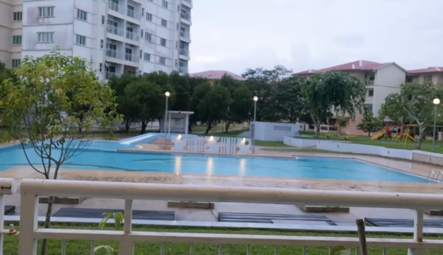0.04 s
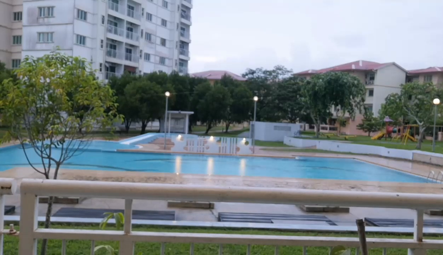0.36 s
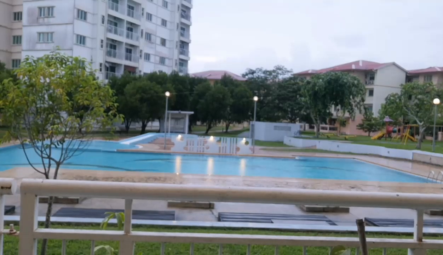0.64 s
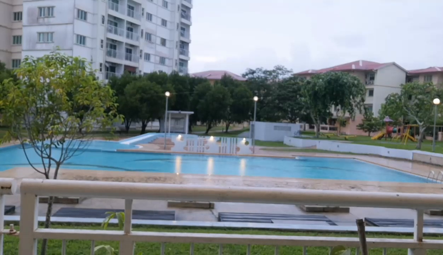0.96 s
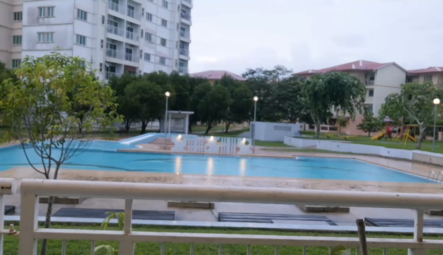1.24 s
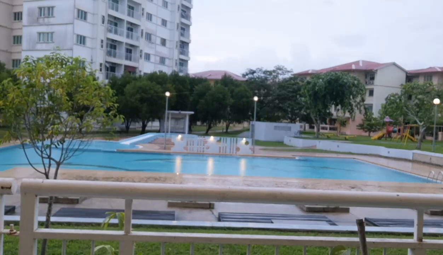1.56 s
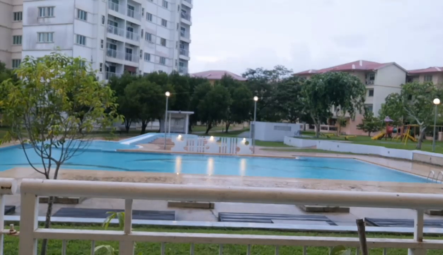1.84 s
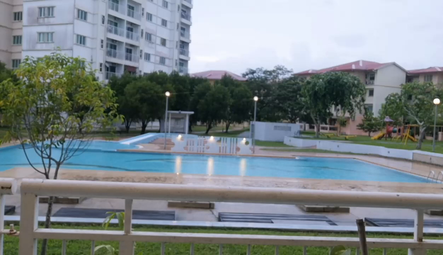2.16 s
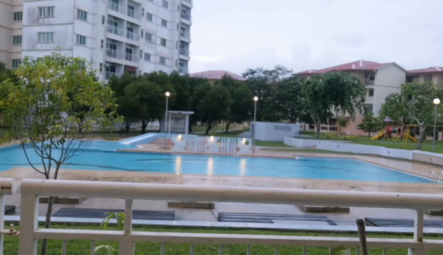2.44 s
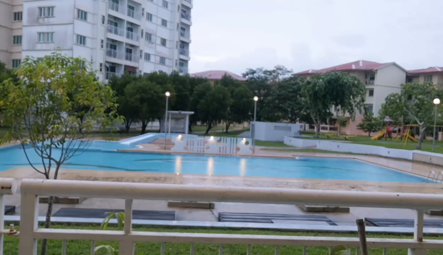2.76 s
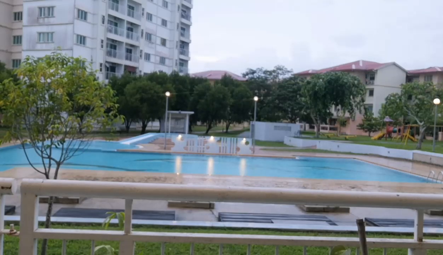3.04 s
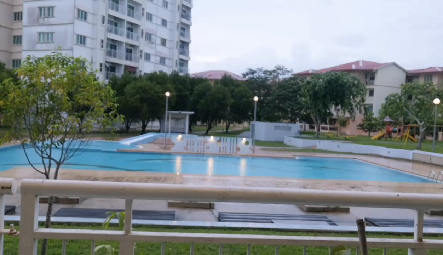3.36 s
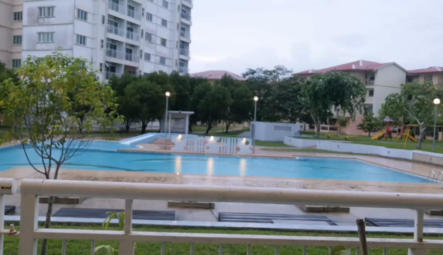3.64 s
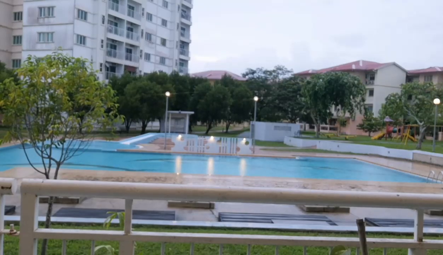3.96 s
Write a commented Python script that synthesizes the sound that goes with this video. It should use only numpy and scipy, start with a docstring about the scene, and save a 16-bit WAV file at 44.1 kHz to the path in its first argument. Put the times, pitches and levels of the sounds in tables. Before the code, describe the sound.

Light rain patters and drips outdoors, with low wind rumble on the microphone.

```python
"""Light rain by a pool among buildings, the microphones under a roof.
From the start rain washes and patters further off and wind rumbles on the microphones; a low hum wavers
through the first second. Drips plink in puddles and gutters; close by they tick on hard ground, tap on
something hollow and splatter, ringing briefly under the shelter. Dull, distant knocks begin at 0.7 s and
a small bird peeps now and then from 1.1 s. Between 1.8 and 2.7 s four puffs of air pop the microphones."""
import sys
import numpy as np
from scipy import signal
from scipy.fft import rfft, irfft
from scipy.io import wavfile
from scipy.ndimage import uniform_filter1d

SR = 44100
rng = np.random.default_rng(int(sys.argv[2]) if len(sys.argv) > 2 else 0)


def materialize(psi):
    """Save the field psi as 16-bit PCM at rate SR to the path in sys.argv[1].

    A 1-D psi becomes a single channel; in a 2-D psi each row is a channel.
    """
    bounded = np.clip(np.atleast_2d(psi).T, -1, 1)
    quanta = np.round(bounded * 32767).astype(np.int16)
    wavfile.write(sys.argv[1], SR, quanta)


N = 176400

# The place, and the microphone pair in it. Table levels are taken before each layer's gain and pan.
SHELTER_T60_S, SHELTER_GRAIN_DB, YARD_T60_S = 0.16, 10, 0.39
FAR_WALL_S, FAR_WALL_DB = 0.093, -13  # one late echo from the building opposite
ALIKE_BELOW_HZ, MIC_LAG_S = 430, 0.00018  # distant bass is alike in both; spread of arrival times

# Far rain on the pool and trees, spectrum: frequency_hz, level_db
WASH_SPECTRUM = [(150,-8.5),(250,-2),(350,-11.5),(600,-15),(950,-13),(1500,-11),(2200,-12.5),(2700,-12.5),(3500,-16.5),(4600,-20.5),(5500,-19.5),(6400,-22.5),(7900,-22.5),(10000,-24),(13000,-31),(15500,-37)]
# Its rise and fall: time_s, level_db
WASH_LEVELS = [(0,-46.5),(.35,-46.5),(.6,-47.5),(.8,-45.5),(1.0,-53.5),(1.15,-46),(1.5,-52),(1.7,-49),(2.1,-48.5),(2.25,-52.5),(2.6,-48.5),(2.8,-49.5),(2.95,-51.5),(3.4,-49),(4,-50)]
# Nearer patter of small drops, spectrum: frequency_hz, level_db
PATTER_SPECTRUM = [(800,-25),(1600,-1),(2800,-9),(3700,-6.5),(5400,1.5),(6500,-4),(7900,6.5),(10000,-8.5),(15000,-26.5)]
# Its rise and fall: time_s, level_db
PATTER_LEVELS = [(0,-48),(.65,-49.5),(.95,-58),(1.15,-55),(1.48,-56.5),(1.62,-51.5),(2.1,-52.5),(2.3,-55),(2.6,-53),(2.78,-59),(2.88,-54.5),(3.25,-54.5),(3.55,-54.5),(4,-53)]
WASH_DB, WASH_PAN_DB, FLICKER_DB = -5.5, -0.9, 1.5
PATTER_DB, PATTER_PAN_DB, PATTER_WET_DB = -10, -6, 1

# Wind rumble on the microphones, spectrum: frequency_hz, level_db
RUMBLE_SPECTRUM = [(10,-16.5),(22,0),(35,-2),(55,-3.5),(75,-9),(100,-23),(160,-27.5),(300,-60.5)]
# Its gusts: time_s, level_db
RUMBLE_LEVELS = [(0,-28),(.09,-42),(.24,-34),(.32,-45),(.41,-37.5),(.94,-38.5),(1,-47),(1.25,-45),(1.53,-51),(1.68,-42),(1.85,-38.5),(2.03,-44.5),(2.22,-56.5),(2.47,-42),(2.57,-44),(2.66,-37.5),(2.79,-54.5),(3.08,-45),(3.17,-37),(3.28,-43),(3.47,-51.5),(3.59,-40),(3.76,-50.5),(3.9,-37.5),(4,-55)]
# The wind's higher flutter, spectrum: frequency_hz, level_db
FLUTTER_SPECTRUM = [(60,-29),(95,-8),(112,0.5),(130,-5),(146,-8.5),(165,-10),(210,-17.5),(250,-34),(400,-36),(800,-63)]
# Its gusts: time_s, level_db
FLUTTER_LEVELS = [(0,-38.5),(.13,-43.5),(.21,-42.5),(.32,-42),(.5,-38.5),(.8,-42),(1,-46),(1.3,-50.5),(1.58,-58.5),(1.85,-53),(2.05,-50),(2.23,-61),(2.5,-60),(2.7,-45.5),(2.83,-67),(3.22,-51.5),(3.4,-62),(4,-56)]
# Single puffs of air on the microphones: centre_s, peak_db, half_width_s
AIR_PUFFS = [(1.79,-25.5,0.0038),(2.534,-21,0.0057),(2.632,-18,0.0076),(2.687,-15.5,0.0035)]
RUMBLE_DB, FLUTTER_DB = 4, 1

# Course of the low hum: time_s, pitch_hz, level_db
HUM_COURSE = [(.12,112.6,-40),(.18,110.7,-26),(.26,111.3,-31),(.33,113.8,-46),(.43,115.2,-46),(.49,116.8,-35.5),(.56,128.5,-30),(.68,128.2,-38.5),(.8,127,-41.5),(0.899,131,-50.5),(1,126,-78)]
HUM_WAVER = 0.026  # share of the pitch

# Farther drips in puddles and gutters: start_s, level_db, pitch_hz, fade_s
FAR_PLINKS = [(0.121,-50.5,5230,.02),(.303,-49,2060,0.017),(0.414,-52,2744,0.077),(0.714,-45.5,1540,0.03),(1.325,-52,3500,0.051),(1.685,-58,5700,0.038),(1.796,-53,1330,.04),(1.823,-53,3570,0.027),(2.408,-55,924,0.051),(2.448,-57,3590,0.11),(2.859,-52,2020,0.012)]
PLINK_WIDTH, PLINK_RISE_S, PLINK_PAN_DB = 0.12, 0.0015, -0.5  # width as a share of the pitch

# Drips on hard ground close by: start_s, level_db, pitch_hz, left_minus_right_db
NEAR_DRIPS = [(0.2324, -58, 7400, -5), (0.2731, -35.5, 4700, 2), (0.2795, -54, 5600, -3),
              (0.4134, -29.5, 7830, -10), (0.4237, -29, 8000, -9), (0.4822, -33, 8406, -1),
              (0.4891, -33.5, 7340, -11), (0.4991, -34, 8200, -15), (0.519, -35, 8900, -12),
              (0.6784, -34.5, 5750, -6), (1.0857, -40, 7500, -7), (1.62, -40, 7850, -5),
              (1.697, -42.5, 5660, -13), (1.8781, -41.5, 7830, -5.0), (1.8951, -42, 7840, 0),
              (1.915, -35, 5920, 0), (1.947, -34, 7700, -7), (2.1016, -35, 7200, -11),
              (2.2547, -39, 4960, 2), (2.3214, -43.5, 4430, -7), (2.4811, -27.5, 7700, -5),
              (2.5176, -40, 5300, -10), (2.5399, -31.5, 8700, -8), (2.8394, -35.5, 8280, -1),
              (3.203, -41, 8800, -13), (3.347, -40, 5800, -3), (3.3665, -38, 8300, -4),
              (3.3947, -34, 8200, -2), (3.4715, -41, 5440, -3), (3.7298, -33.5, 7540, 1),
              (3.7497, -35.5, 8600, -8), (3.761, -33.5, 8100, 0), (3.8591, -28.5, 7080, 2),
              (3.8684, -37, 7400, -12), (3.931, -37, 9000, -3)]
# Crack of a landing drop, spectrum: frequency_hz, level_db
CRACK_SPECTRUM = [(1000,-16),(2700,10.5),(3800,8),(5500,10),(8000,19),(11000,5.5),(15000,-17)]
# Snap of a drip's first contact, spectrum: frequency_hz, level_db
SNAP_SPECTRUM = [(2000,-28),(5000,-2),(8000,-11),(11000,-15),(15000,-14)]
DRIP_DB, CRACK_FADE_S, SNAP_DB, SNAP_FADE_S = -4.5, 0.0012, -5.5, 0.00032
# Heavy drops on something hollow: start_s, level_db, pitch_hz, left_minus_right_db
HOLLOW_TAPS = [(.414,-33.5,2540,-3),(1.3027,-25,2600,1),(1.3035,-26.5,7200,-1),(1.309,-33.5,3740,-18),(1.313,-29.5,6000,-6.5)]
TAP_LOW_CUT_HZ = 1600

# Showers of droplets close by: start_s, level_db, fade_s
SPLATTER_BURSTS = [(.43,-47,0.042),(0.517,-36.5,0.022),(.6,-50.5,0.022),(1.929,-57,0.028),(2.103,-46,0.02),(2.525,-53.5,0.013),(3.375,-54,0.025),(3.751,-53,0.026),(3.862,-50.5,0.023)]
# Their spray, spectrum: frequency_hz, level_db
SPLATTER_SPECTRUM = [(1000,-24),(3500,-16.5),(5600,-4),(6500,-6.5),(8000,-5),(10500,-12),(15000,-22)]
SPLATTER_RISE_S, SPLATTER_DRY_DB, SPLATTER_WET_DB, SPLATTER_PAN_DB = 0.012, -1, -5, -0.5

# Distant knocks: start_s, body_db, clatter_db, rise_s, fade_s
FAR_KNOCKS = [(0.675,-47,-55,0.01,0.074),(0.707,-52,-47,0.0048,0.013),(1.161,-58,-43.5,0.0027,0.068),(1.624,-54.5,-64,0.01,0.027),(1.793,-66,-48.5,0.0054,0.026),(1.91,-59,-53.5,0.028,0.019),(2.023,-51,-57,0.0047,0.047),(2.399,-60.5,-56,0.0096,0.042),(2.45,-61,-54,0.015,0.042),(2.519,-54,-55,0.0045,0.013),(3.24,-66,-48,0.0032,0.0082)]
# Hollow body of the knocked thing: pitch_hz, width_hz, level_db
BODY_MODES = [(282,87,3),(378.6,13,1),(412,8.7,2.5),(454,10,5),(494,76,-6.5)]
# Its clatter, spectrum: frequency_hz, level_db
CLATTER_SPECTRUM = [(500,-1.5),(750,-7.5),(940,3.5),(1100,-3),(1350,-0.5),(1680,3),(2300,0),(2650,4.5),(3200,-7),(4500,-7),(8000,-20)]
KNOCK_PAN_DB = -3.5

# A small bird off to the right: start_s, length_s, pitch_hz, glide_hz_per_s, level_db, rasp_share
BIRD_PEEPS = [(1.102,0.084,4375,1201.5,-52.5,0.032),(2,0.069,4375,-300,-61,0.0041),(2.307,0.06,4470,-700,-62.5,0.008),(3.506,0.048,4340,5995.5,-53,0.034),(3.517,0.12,4130,-1,-58,.09)]
RASP_PER_S, BIRD_DRY_DB, BIRD_WET_DB, BIRD_PAN_DB = 380, -2, 3.5, -8.5

TOP_HZ = 15000


def undb(db):
    """Decibels to gain."""
    return 10 ** (np.asarray(db) / 20)


def unit(x):
    """Scale to rms 1."""
    return x / np.sqrt(np.mean(x ** 2))


def curve(rows):
    """Gain along (time_s, level_db) points."""
    return undb(np.interp(np.arange(N) / SR, *np.array(rows).T))


def colour(x, points):
    """Causal filter through (frequency_hz, level_db) points; the result has rms 1."""
    hz, db = np.array(points).T
    bin_hz = np.maximum(np.arange(N + 1) * SR / (2 * N), 1)
    cepstrum = irfft(np.log(undb(np.interp(np.log(bin_hz), np.log(hz), db))))
    cepstrum[1:N] *= 2  # fold to minimum phase
    cepstrum[N + 1:] = 0
    return unit(irfft(rfft(x, 2 * N) * np.exp(rfft(cepstrum)))[..., :N])


def band(x, hz, width_hz):
    """Resonance applied twice, for steep sides; the result has rms 1."""
    b, a = signal.iirpeak(hz, hz / (1.55 * width_hz), fs=SR)
    return unit(signal.lfilter(b, a, signal.lfilter(b, a, x)))


def pan(db):
    """Microphone gains for a level difference, left minus right."""
    return undb(np.array([[db], [-db]]) / 2)


def wide(side):
    """Stereo noise with a given ratio of side to mid."""
    mid, spread = rng.standard_normal((2, N))
    return np.array([mid + side * spread, mid - side * spread])


def diffuse(side):
    """Noise from all around: alike at both microphones in the bass, largely unrelated in the treble."""
    mid, spread = rng.standard_normal((2, N))
    spread = side * signal.sosfilt(signal.butter(2, ALIKE_BELOW_HZ, "high", fs=SR, output="sos"), spread)
    return np.array([mid + spread, mid - spread])


def walk(per_s):
    """Random wander with rms 1."""
    hold = int(SR / per_s)
    steps = np.repeat(rng.standard_normal(N // hold + 1), hold)
    return unit(uniform_filter1d(steps, hold)[:N])


def burst(start, rise, fade):
    """Straight rise, then exponential fade."""
    age = np.arange(N) / SR - start
    return np.clip(age / rise, 0, 1) * np.exp(-np.maximum(age - rise, 0) / fade)


def echoes(x, t60_s=SHELTER_T60_S, grain_db=SHELTER_GRAIN_DB, gap_s=0.0016):
    """Uneven, dying reflections, different at each microphone; by default those of the shelter."""
    t = np.arange(SR) / SR
    tail = rng.standard_normal((2, SR))
    tail *= undb(grain_db * np.clip(rng.standard_normal((2, SR)), -2, 2))
    tail *= (t > gap_s) * np.exp(-np.log(1000) * t / t60_s)
    tail /= np.sqrt(np.sum(tail ** 2, axis=1, keepdims=True))
    return signal.fftconvolve(x, tail, axes=1)[:, :N]


def droplets(per_s, spread_db):
    """Random clicks of uneven size, reaching the right microphone a little before or after the left."""
    hits = (rng.random(N) < per_s / SR) * rng.choice([-1, 1], N)
    size_db = spread_db * np.clip(rng.standard_normal(N), -2, 2)
    left, right = hits * undb(size_db + 2 * rng.standard_normal((2, N)))
    lag = np.round(MIC_LAG_S * SR * rng.standard_normal(N))
    arrival = np.clip(np.arange(N) + lag, 0, N - 1).astype(int)
    return np.array([left, np.bincount(arrival, right, N)])


def rain():
    """Beyond the roof, a wash from the pool and trees; nearer and to the right, small drops patter."""
    wash = colour(diffuse(side=0.98), WASH_SPECTRUM) * curve(WASH_LEVELS) * pan(WASH_PAN_DB)
    wash *= undb(FLICKER_DB * walk(per_s=18))
    patter = colour(droplets(per_s=420, spread_db=9.5), PATTER_SPECTRUM)
    patter *= curve(PATTER_LEVELS) * pan(PATTER_PAN_DB)
    return undb(WASH_DB) * wash + undb(PATTER_DB) * (patter + undb(PATTER_WET_DB) * echoes(patter))


def wind():
    """Eddies rumble and flutter right on the microphones; each single puff pushes them once."""
    rumble = colour(wide(0.095), RUMBLE_SPECTRUM) * curve(RUMBLE_LEVELS)
    flutter = colour(wide(0.14), FLUTTER_SPECTRUM) * curve(FLUTTER_LEVELS)
    out = undb(RUMBLE_DB) * rumble + undb(FLUTTER_DB) * flutter
    for centre, db, half_width in AIR_PUFFS:
        offset = (np.arange(N) / SR - centre) / half_width
        out += undb(db) * (1 - offset ** 2) * np.exp(-offset ** 2 / 2)
    return out


def hum():
    """A low, nearly pure tone of unsteady pitch, dead centre, dying away after the first second."""
    times, hz, db = np.array(HUM_COURSE).T
    pitch = np.interp(np.arange(N) / SR, times, hz) * (1 + HUM_WAVER * walk(per_s=38))
    return curve(np.c_[times, db]) * np.sin(2 * np.pi * np.cumsum(pitch) / SR)


def plinks():
    """Farther drips ring once each in puddles and gutters, blurred by the walls."""
    blur = wide(0.87)
    return pan(PLINK_PAN_DB) * sum(
        undb(db) * burst(start, PLINK_RISE_S, fade) * band(blur, hz, PLINK_WIDTH * hz)
        for start, db, hz, fade in FAR_PLINKS)


def impacts(rows, ring_s, crack_db, wet_db):
    """Each drop lands with a sharp crack and a ring of a few cycles, thrown back by the shelter."""
    t, out = np.arange(N) / SR, np.zeros((2, N))
    grit = colour(wide(1), CRACK_SPECTRUM)
    mic_phases = rng.normal(0, 0.98, (len(rows), 2, 1))
    for (start, db, hz, pan_db), phase in zip(rows, mic_phases):
        ring = np.sin(2 * np.pi * hz * (t - start) + phase) * burst(start, 0.00029, ring_s)
        crack = undb(crack_db) * grit * burst(start, 0.0001, CRACK_FADE_S)
        out += undb(db) * pan(pan_db) * (ring + crack)
    return out + undb(wet_db) * echoes(out)


def drips():
    """Drips tick on hard ground close to the microphones."""
    return undb(DRIP_DB) * impacts(NEAR_DRIPS, ring_s=0.00094, crack_db=-3, wet_db=1)


def snaps():
    """The first contact of each near drip: a very short, dry, bright click."""
    grit = colour(wide(1), SNAP_SPECTRUM)
    return grit * sum(undb(db + SNAP_DB) * pan(pan_db) * burst(start, 0.0001, SNAP_FADE_S)
                      for start, db, _, pan_db in NEAR_DRIPS)


def taps():
    """Heavy drops strike something hollow nearby, too small to give any bass."""
    hits = impacts(HOLLOW_TAPS, ring_s=0.00055, crack_db=-12, wet_db=-1.5)
    return signal.sosfilt(signal.butter(4, TAP_LOW_CUT_HZ, "high", fs=SR, output="sos"), hits)


def splatters():
    """Close by, big drops burst into showers of droplets that echo under the roof."""
    spray = colour(droplets(per_s=1800, spread_db=1.8), SPLATTER_SPECTRUM)
    spray *= sum(undb(db) * burst(start, SPLATTER_RISE_S, fade) for start, db, fade in SPLATTER_BURSTS)
    return pan(SPLATTER_PAN_DB) * (undb(SPLATTER_DRY_DB) * spray + undb(SPLATTER_WET_DB) * echoes(spray))


def knocks():
    """Dull knocks, blurred by distance into a hollow body and a brighter clatter."""
    body = unit(sum(undb(db) * band(diffuse(0.82), hz, width) for hz, width, db in BODY_MODES))
    clatter = colour(wide(1), CLATTER_SPECTRUM)
    return pan(KNOCK_PAN_DB) * sum(
        burst(start, rise, fade) * (undb(body_db) * body + undb(clatter_db) * clatter)
        for start, body_db, clatter_db, rise, fade in FAR_KNOCKS)


def bird():
    """Thin gliding peeps some way off, the last of them raspy, echo between the buildings."""
    t, song = np.arange(N) / SR, np.zeros(N)
    for start, length, hz, glide, db, rasp in BIRD_PEEPS:
        age = np.clip(t - start, 0, length)
        pitch = (hz + glide * (age - length / 2)) * (1 + rasp * walk(RASP_PER_S))
        song += undb(db) * np.sin(np.pi * age / length) * np.sin(2 * np.pi * np.cumsum(pitch) / SR)
    wall_echo = undb(FAR_WALL_DB) * np.interp(t - FAR_WALL_S, t, song)
    song = (song + wall_echo) * pan(BIRD_PAN_DB)
    return undb(BIRD_DRY_DB) * song + undb(BIRD_WET_DB) * echoes(song, YARD_T60_S, grain_db=1)


def scene():
    """Everything that reaches the microphones under the roof, near and far."""
    water = rain() + drips() + snaps() + taps() + plinks() + splatters()
    return water + knocks() + bird() + hum() + wind()


def record(dry):
    """The recorder cuts the top treble steeply."""
    return signal.sosfilt(signal.ellip(8, .2, 70, TOP_HZ, fs=SR, output="sos"), dry)


dry = scene()
out = record(dry)
materialize(out)
```